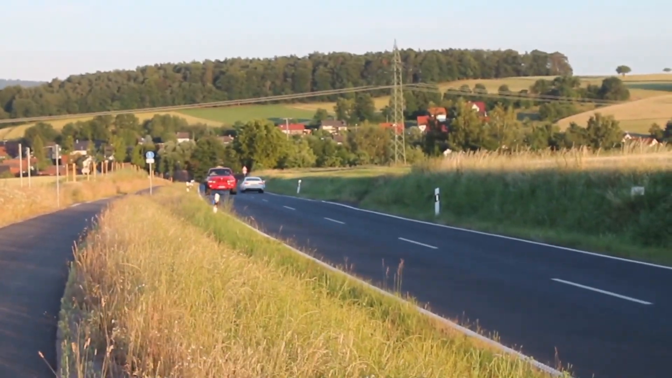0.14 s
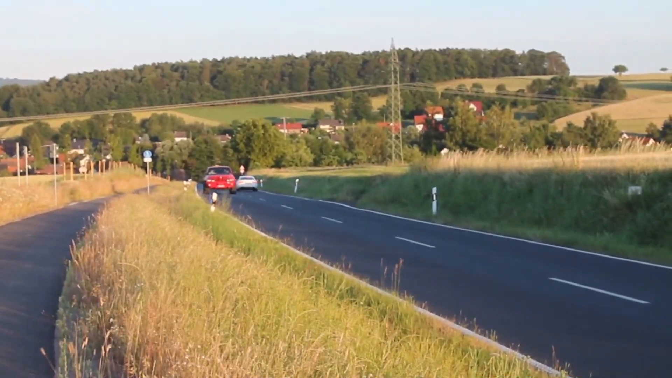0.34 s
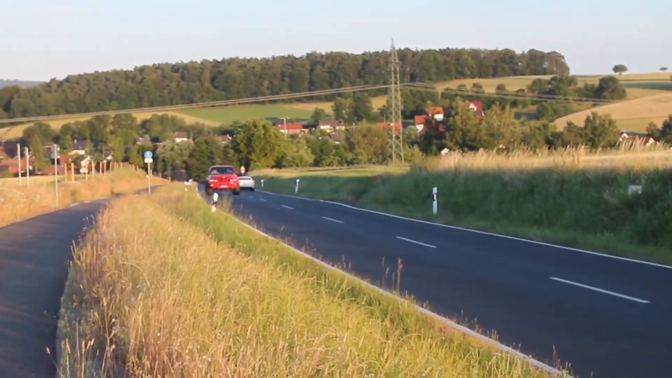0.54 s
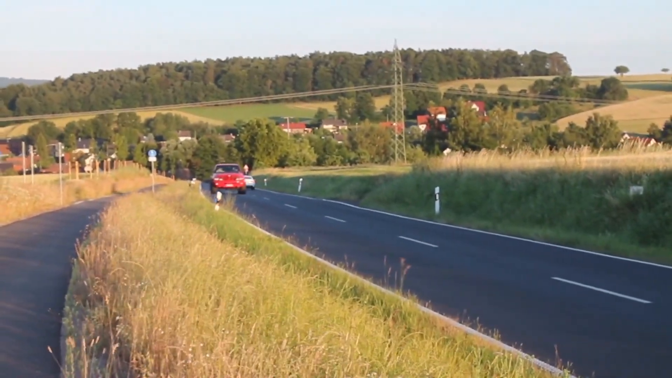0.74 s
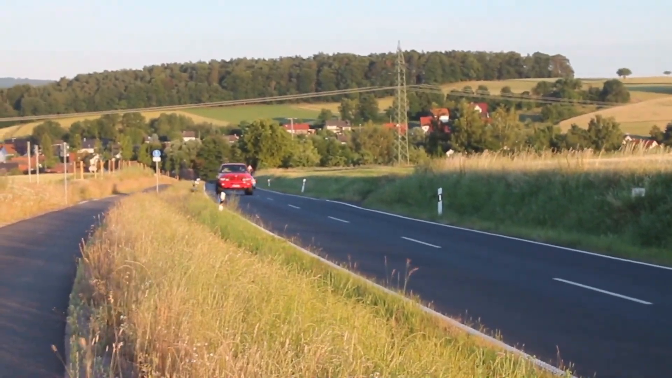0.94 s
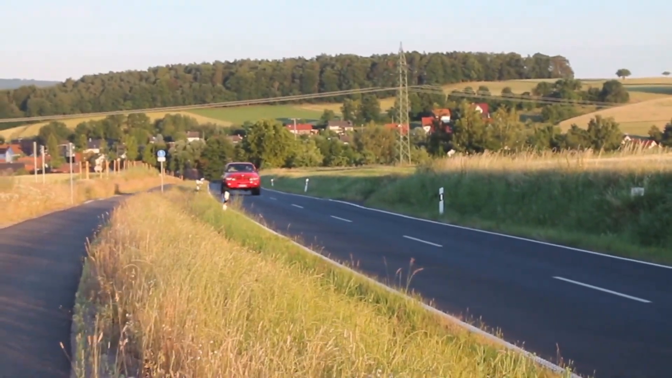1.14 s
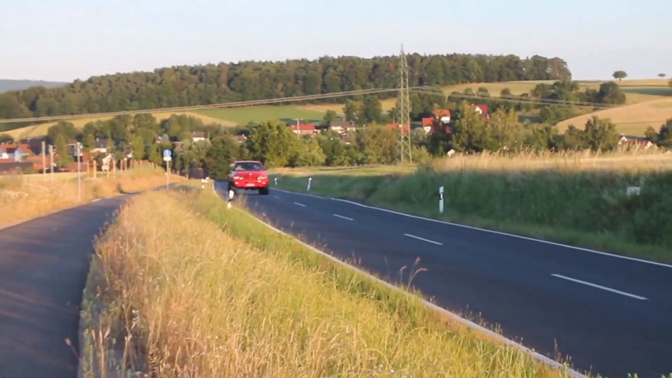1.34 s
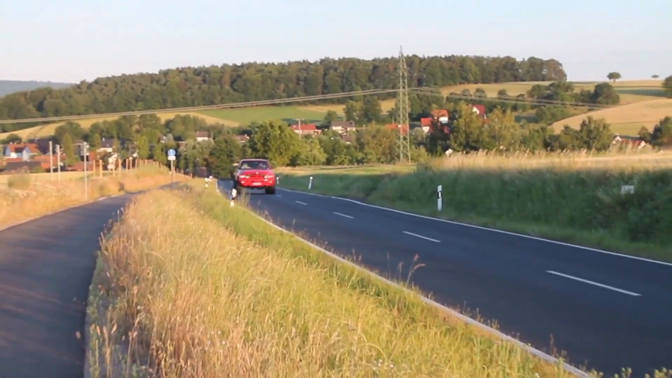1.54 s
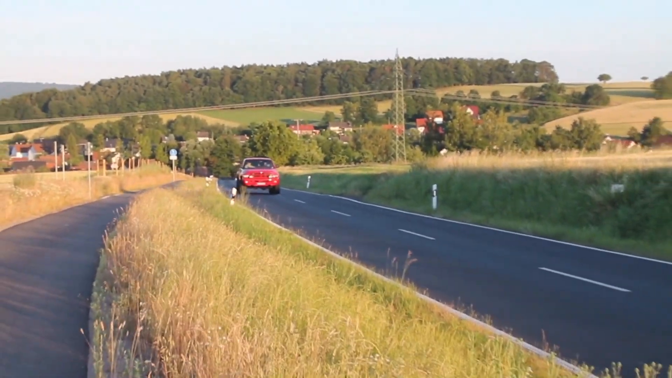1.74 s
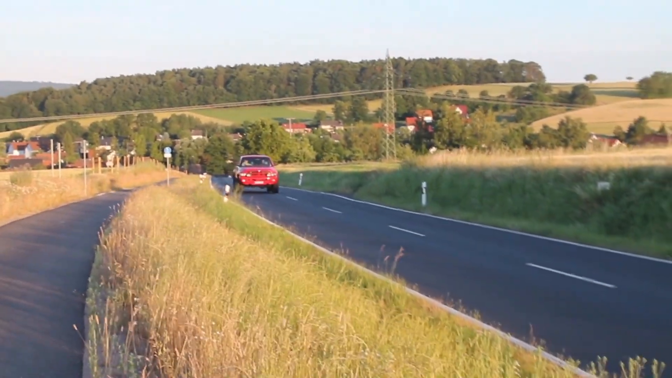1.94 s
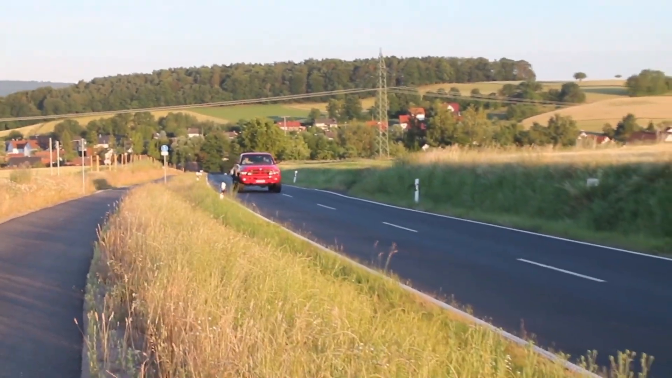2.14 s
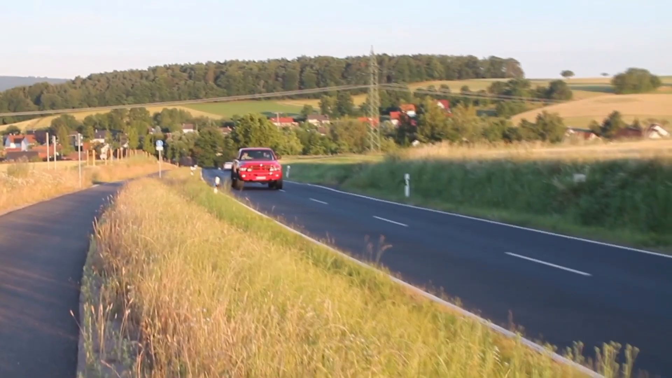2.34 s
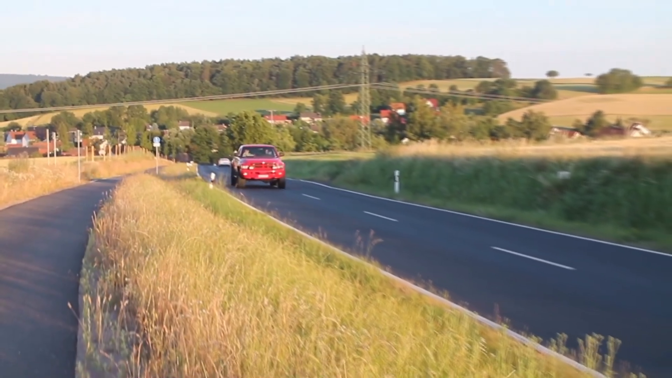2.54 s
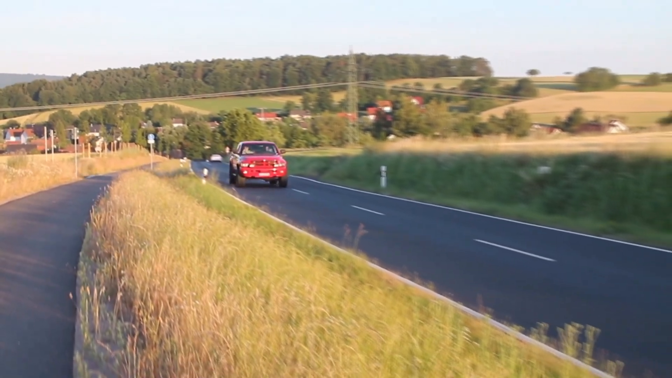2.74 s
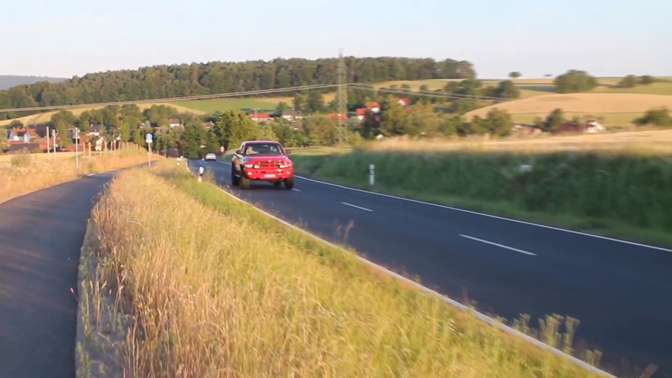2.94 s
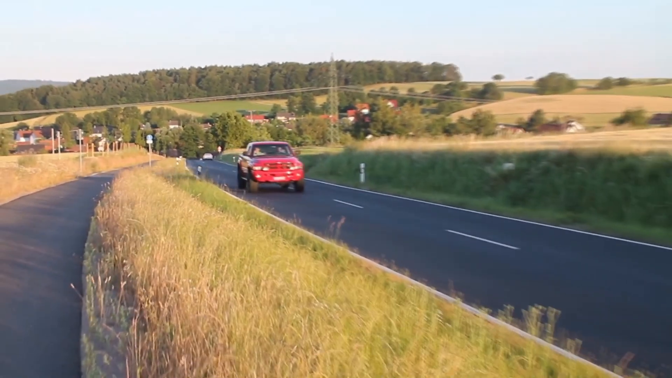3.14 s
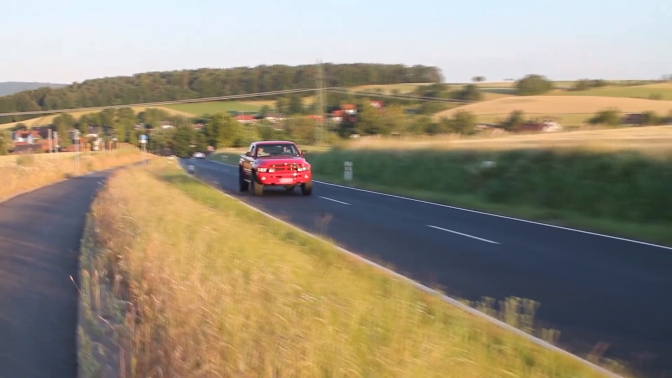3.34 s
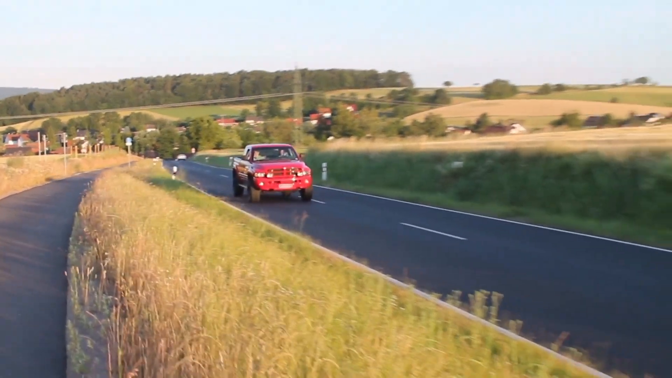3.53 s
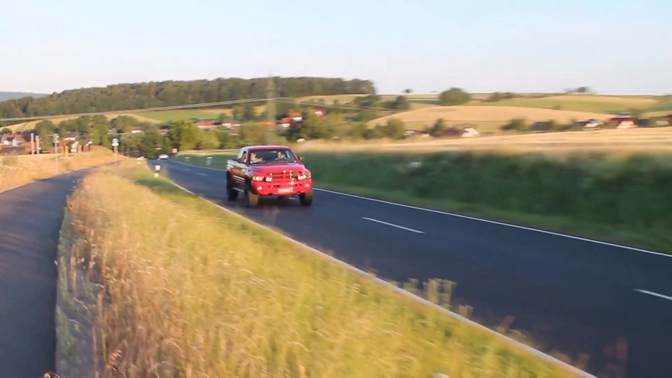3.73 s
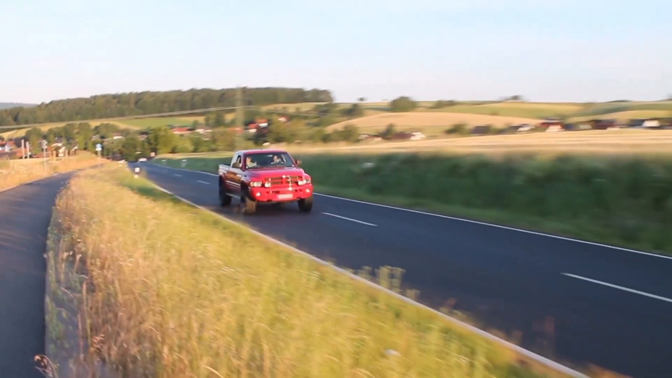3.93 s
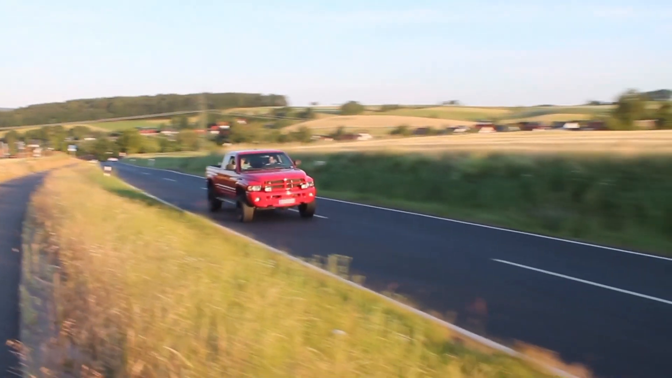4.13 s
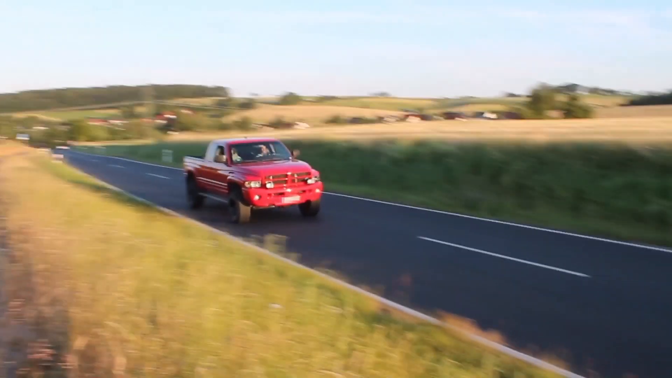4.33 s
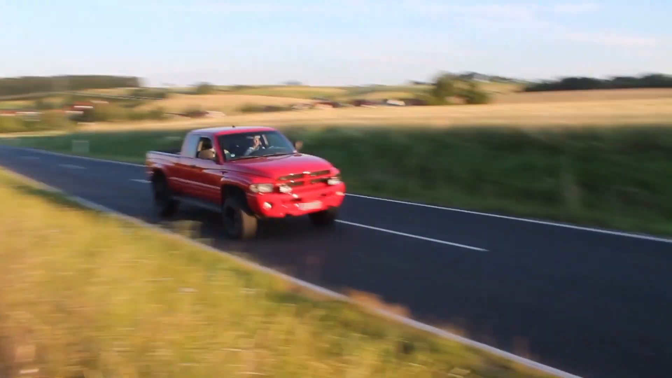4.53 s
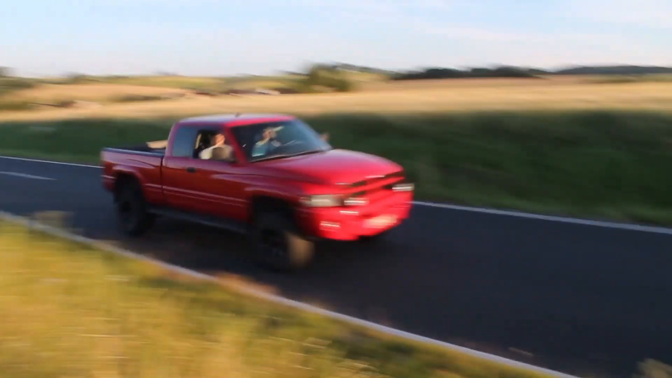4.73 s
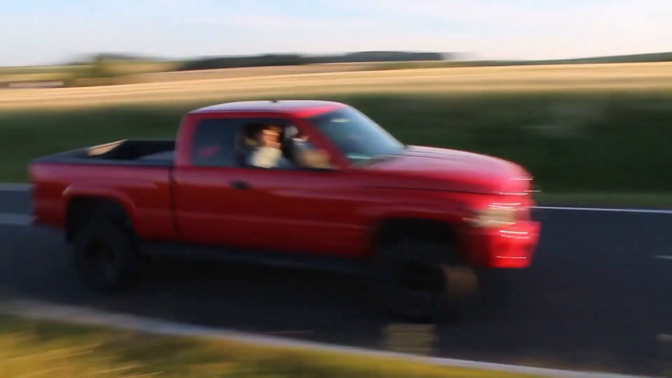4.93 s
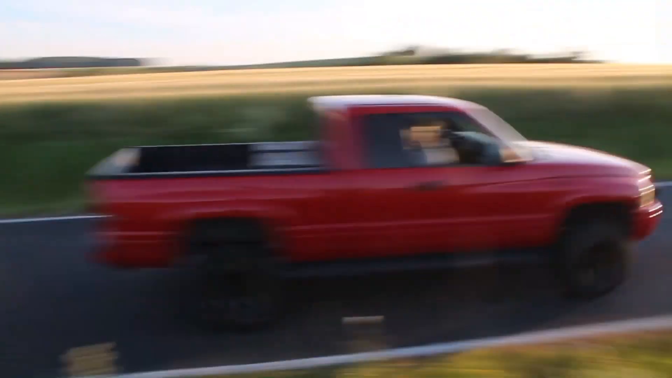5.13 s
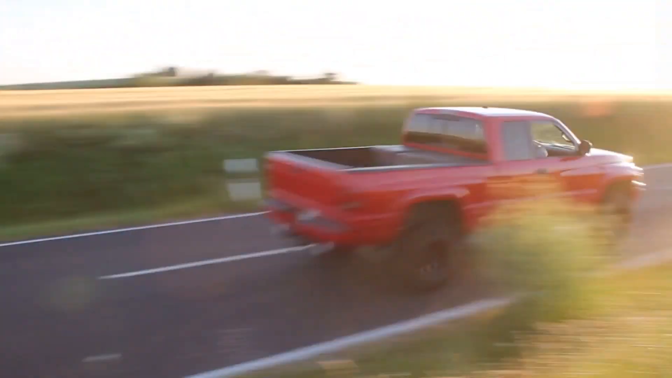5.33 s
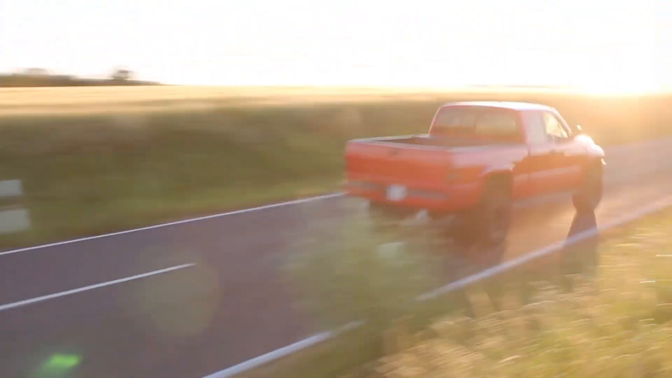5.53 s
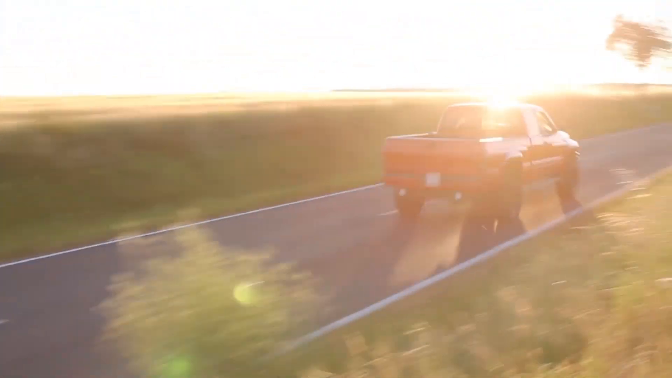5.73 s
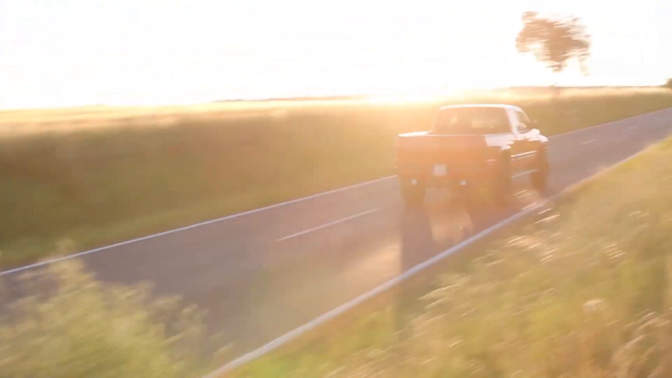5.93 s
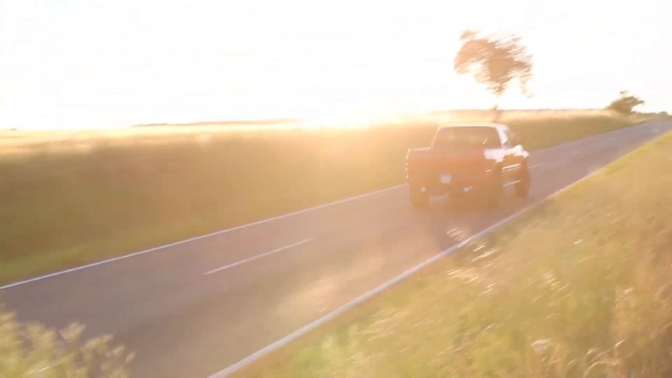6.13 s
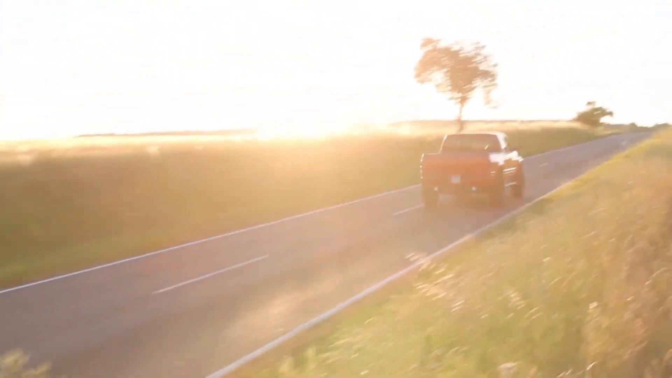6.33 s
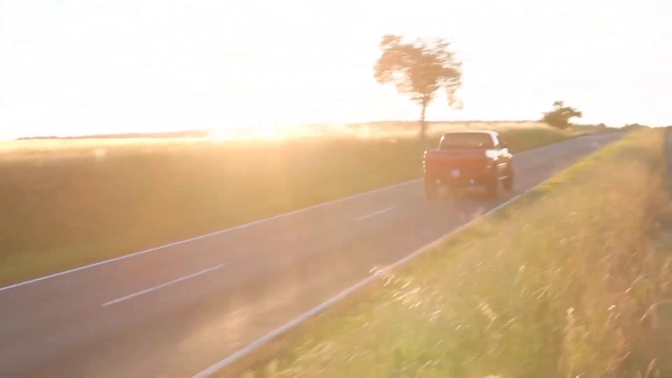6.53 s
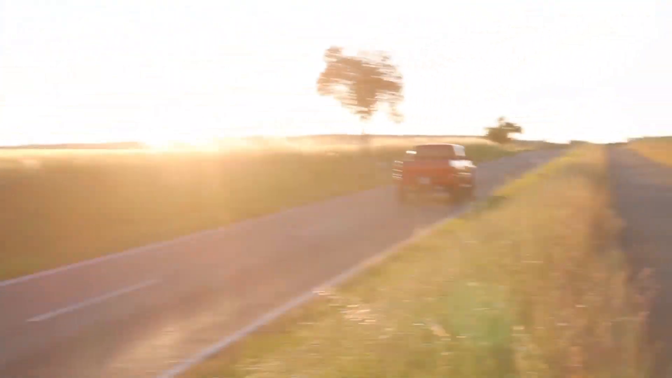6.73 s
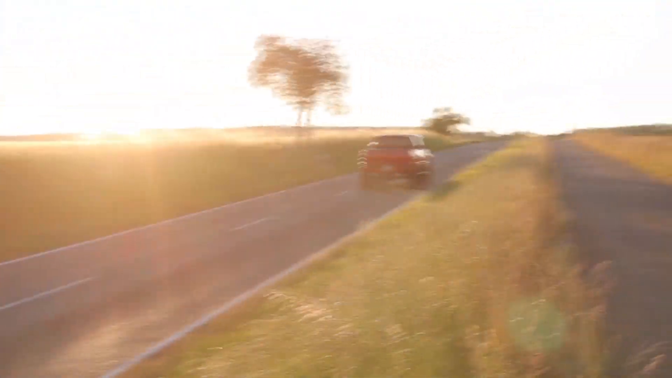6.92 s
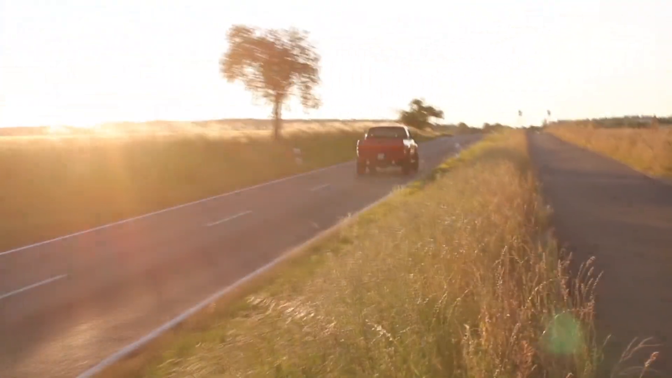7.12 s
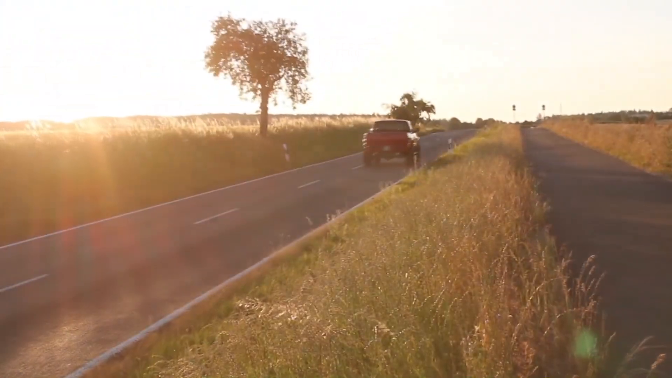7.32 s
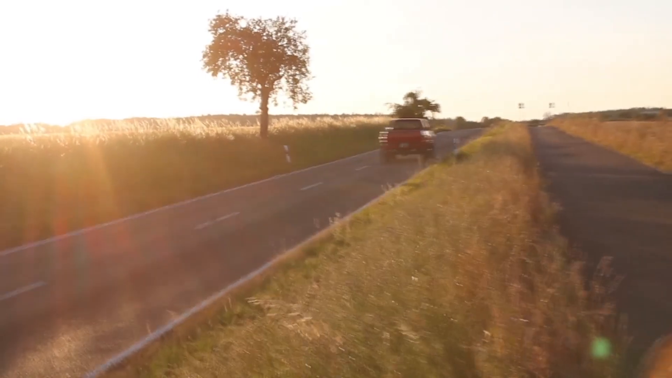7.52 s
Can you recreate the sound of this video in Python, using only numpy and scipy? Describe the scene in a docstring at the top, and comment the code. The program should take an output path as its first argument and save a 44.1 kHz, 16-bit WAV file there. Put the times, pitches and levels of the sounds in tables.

```python
"""A six-cylinder diesel pickup pulls up a country road, passes close to a camera microphone and draws away.
Its exhaust is a sum of lines locked to the firing rate; the knock, roar and hiss are coloured noise
that swells at each firing; the turbo and gears whistle as unsteady sines and the tyres ring as resonances.
Another car recedes at first as fading noise, three bush crickets chirp in the verge in rasps of noise,
and light wind thumps the microphone with short pressure pulses."""
import sys
import numpy as np
from scipy import signal
from scipy.fft import rfft, irfft, next_fast_len
from scipy.io import wavfile
from scipy.ndimage import uniform_filter1d, map_coordinates

SR = 44100
rng = np.random.default_rng(int(sys.argv[2]) if len(sys.argv) > 2 else 0)


def file_out(sig):
    """Save sig as 16-bit WAV at sys.argv[1]."""
    # one column per channel
    cols = np.atleast_2d(sig).T
    # limit, then scale
    lim = np.clip(cols, -1, 1)
    pcm = np.round(lim * 32767).astype(np.int16)
    wavfile.write(sys.argv[1], SR, pcm)


N = 338247
T = np.arange(N) / SR  # time of each sample [s]

# the pass: truck closest [s], its speed [m/s], distance to the lane [m]
PASS_S, SPEED_M_S, LANE_M = 5.06, 16, 6
BOUNCE_M2 = .68  # twice the product of source and microphone heights [m2]
PIPE_PASS_S, PIPE_GAP_M = 5.19, 3  # tailpipe closest [s], its distance then [m]
SOUND_M_S = 343
# where in its cycle the engine starts, and the knock's lead on the exhaust beat [firings]
FIRST_FIRING, KNOCK_LEADS = .62, .39
CREST_DB = 11  # peak of a knock over its rms
TOP_HZ = 15780  # upper band limit

# engine speed as the driver opens up: (time [s], firing rate at the truck [Hz])
FIRING_RATE = [(0, 87.73), (2.3, 88.1), (3.3, 91.32), (4.3, 96.27), (5.1, 99.35), (5.95, 99.45),
               (6.8, 102.64), (7.67, 105.56)]
# level of the truck: (time [s], exhaust [dB], engine knock [dB])
TRUCK_LEVEL = [(0, -35, -49), (.6, -31.5, -50.5), (1.2, -28, -53), (1.8, -25, -45), (2.35, -24, -35),
               (2.8, -19.5, -32), (3.2, -12, -29), (3.5, -12.5, -27), (3.85, -12, -26), (4.3, -13.5, -24),
               (4.8, -15, -23.5), (5.15, -18, -21.5), (5.5, -14.5, -22), (5.75, -12.5, -24),
               (6.2, -16.5, -25), (6.7, -23, -25.5), (7.2, -25.5, -30), (7.67, -25.5, -32.5)]
# exhaust colour by place: (distance past the microphone [m], firing multiples 1 to 6 [dB],
# uneven lines [dB], rumble [dB]), all over the exhaust level
EXHAUST_COLOUR = [(-82, -3.5, 0, -14.5, -27, -48, -42, -20, -8.5),
                  (-58.5, -6.5, 0, -15.5, -21, -52, -32, -15, -10.5),
                  (-36, -5.5, 0, -11.5, -23.5, -27.5, -26, -19.5, -12.5),
                  (-15.5, -7, 0, -8.5, -29, -27, -27, -7, -16.5),
                  (-1, -6.5, 0, -11, -9.5, -15, -15, -8, -15),
                  (2.5, -3, 0.0042, -16, -9.5, -16, -32, -6, -9.5),
                  (10, -6.5, 0, -10, -20, -25, -29, -8, -15), (26, 4.5, 0, -4.5, -11.5, -30, -33, -1, -3),
                  (39, 5.5, 0, -15, -27, -17, -27, -2, -2)]
# unequal cylinders put lines between the firing multiples: (multiple of shaft speed, relative level [dB])
UNEVEN_LINES = [(2, -41), (4, -20), (5, -8.5), (7, -13.5), (8, -13), (10, -16), (11, -20), (13, -22),
                (14, -24), (16, -18), (17, -20), (19, -18), (20, -19.5), (21, -20), (22, -21), (23, -17),
                (24, -24.5), (25, -23.5), (26, -35)]
# spectrum of the exhaust rumble: (frequency [Hz], relative level [dB])
RUMBLE_COLOUR = [(15, -18), (40, -11), (80, -0.5), (140, 2), (260, 2.5), (380, -10.5), (520, -35)]
# noise colour by place: (distance past the microphone [m], tyre roar [dB], hiss [dB]), both over the knock
NOISE_BALANCE = [(-78, 7.5, -17), (-59, 8.5, -12), (-41, 1.5, -17), (-24.5, 5, -20), (-15.5, 3.5, -9),
                 (-11, 2.5, -2), (-2.5, -8, 0), (1.5, -2.5, 1.5), (7, -0.5, -4), (15.5, 5.5, -4.5),
                 (29, 2, -12), (30, 4, -11)]
# the knock blurs with distance: (time [s], sharpness [0-1])
SHARPNESS = [(0, .1), (2.8, .15), (3.9, .4), (4.6, .68), (5.1, .85), (5.4, .85), (5.8, .45), (6.5, .2),
             (7.67, .12)]
# roar heard from ahead and from behind: (frequency [Hz], relative level [dB per Hz])
ROAR_AHEAD = [(220, -2), (380, -3.5), (444, -19.5), (582, -4.5), (668, -1), (786, 0), (848, 1.5),
              (925, -9.5), (1160, -0.5), (1560, -6.5), (1700, -4), (2210, -18), (3740, -120)]
ROAR_BEHIND = [(220, -25), (380, -1.5), (395, 5.5), (454, -19), (525, -8), (576, 1), (622, 1.5), (888, 2),
               (1020, 3.5), (1360, -2.5), (1610, 1.5), (1990, -2.5), (2400, -5), (3120, -11.5),
               (5280, -120)]
# knock of the engine, then hiss from ahead and from behind: (frequency [Hz], relative level [dB])
KNOCK_COLOUR = [(710, -7), (1200, -2), (1550, -6), (1910, 2), (2220, 0.5), (3610, -4), (4470, -10),
                (5400, -14), (7020, -25.5), (11900, -120)]
HISS_AHEAD = [(2650, -0.5), (4500, 2), (5500, -1), (6310, 1.5), (7170, -0.5), (8620, -3.5), (9800, -17),
              (12500, -26.5), (16200, -62), (22000, -120)]
HISS_BEHIND = [(2650, -1), (4500, 3.5), (5900, -4.5), (6800, 0.5), (8000, -3.5), (9300, -13),
               (10300, -20.5), (11000, -25), (12500, -33), (16000, -55)]
# a dark band in the treble that moves as the camera turns: (time [s], centre [Hz], depth [dB])
DARK_BAND = [(1.8, 5500, 0), (2.3, 5750, -5), (3.2, 6340, -3), (3.5, 7000, -6), (5.3, 9500, 0),
             (5.55, 8600, -11), (6, 7850, -11), (6.5, 7420, -7), (6.9, 7200, -1)]
# receding car: (time [s], level [dB]), and its tyre noise: (frequency [Hz], relative level [dB])
CAR_LEVEL = [(0, -34), (.3, -35.5), (.6, -38), (.9, -50), (1.3, -60), (1.8, -86)]
CAR_COLOUR = [(260, -69), (450, -39), (737, -3), (1090, -2.5), (1500, -13), (1700, -17), (2000, -32),
              (3100, -25), (5130, -54), (7000, -54), (9100, -82), (15400, -120)]
# cricket songs, named by wing pitch:
# (first chirp [s], chirp period [s], wing pitch [Hz], width [Hz], steepness of its flanks)
HIGH_SONG = (0.074, .1113, 10600, 2700, 2.2)
MIDDLE_SONG = (0.038, 0.11, 10160, 1400, 4)
LOW_SONG = (0.0964, .1124, 9400, 1450, 2.5)
# cricket levels: (time [s], level [dB])
HIGH_LEVEL = [(0, -53.5), (.5, -53), (1, -56.5), (1.5, -56), (1.9, -65)]
MIDDLE_LEVEL = [(0, -69), (.5, -69), (.9, -56), (1.4, -58), (1.65, -68)]
LOW_LEVEL = [(0, -66), (.9, -59), (1.5, -56), (2.5, -53), (3.7, -54.5), (5, -74), (6.5, -52), (7.67, -55.5)]
# wing strokes of a chirp: (time in the chirp before a 9 ms lag [s], relative level [dB])
WING_STROKES = [(-.004, -13), (0.032, -14), (.071, -30)]
# steady background noise: (frequency [Hz], relative level [dB])
FLOOR_COLOUR = [(20, -16), (300, -18), (2000, -20), (6000, -22), (12000, -19), (16000, -19)]
# wind thumps: (time [s], peak level [dB], pitch [Hz], length [s])
WIND_THUMPS = [(.44, -32, 80, 0.043), (1.557, -27, 130, 0.03), (1.588, -33, 180, 0.017),
               (2.234, -12.5, 147, 0.016), (2.252, -18, 335, 0.0088), (2.274, -12, 189, 0.0079),
               (2.305, -19, 121, .025), (2.565, -22, 171, 0.016), (3.27, -9, 244, 0.008),
               (3.273, -10, 483, 0.0058), (3.291, -12, 387, 0.0061), (3.34, -18, 119, 0.024),
               (3.39, -11, 180, 0.013), (3.449, -18, 200.5, .025), (3.693, -22, 130, .025)]
# gear whine: (time [s], pitch [Hz], level [dB])
GEAR_WHINE = [(1.3, 3330, -85), (1.55, 3320, -62), (1.9, 3350, -52), (2.17, 3330, -49), (2.3, 3340, -54),
              (3, 3300, -48), (4, 3390, -44), (4.4, 3365, -49)]
# engine block heard from ahead: (frequency [Hz], width [Hz], relative level [dB]), then (time [s], level [dB])
BLOCK_MODES = [(810, 167, 5.5), (1920, 350, 0.5), (3424, 360, -0.5), (6840, 710, -11.5)]
BLOCK_LEVEL = [(1.5, -66), (2.5, -63), (3.2, -41), (4, -30), (4.5, -20), (4.9, -31), (5.15, -38),
               (5.399, -68)]
# growl of the tailpipe as its side comes into view:
# (frequency [Hz], width [Hz], relative level [dB]), then (time [s], level [dB])
GROWL_MODES = [(553, 150, -0.14), (690, 160, 0.47), (806, 26, -1.8)]
GROWL_LEVEL = [(3.2, -81), (4, -42), (4.5, -31), (4.64, -21.5), (4.95, -22), (5.08, -30.5), (5.3, -36.5),
               (5.6, -27), (6.2, -40), (6.7, -40), (7, -66)]
# lines in the growl: (multiple of shaft speed, relative level [dB])
PURR_LINES = [(16, 0), (17, -9), (19, -10), (20, -3), (22, -2), (23, -9), (25, -9)]
# turbo whistle: (time [s], pitch at the truck [Hz], level [dB])
TURBO_WHISTLE = [(3.3, 10200, -110), (3.36, 10300, -64), (3.6, 10880, -68), (3.95, 11420, -65),
                 (4.35, 11790, -61), (4.75, 11800, -58), (4.97, 11740, -63), (5.1, 11700, -95),
                 (5.42, 11560, -95), (5.52, 11550, -62), (5.85, 11600, -67), (6.05, 11640, -110)]
# top edge of the knock: (time [s], level [dB]), then (frequency [Hz], relative level [dB])
EDGE_LEVEL = [(3.5, -69), (3.9, -60), (4.45, -48), (4.75, -53), (5.15, -45), (5.45, -56), (5.7, -54),
              (6.15, -65), (6.6, -57), (7.1, -82)]
EDGE_COLOUR = [(9000, -20), (11000, -2), (13000, -6), (16000, -12)]
# tyre cavities heard from behind: (frequency [Hz], width [Hz], relative level [dB]), then (time [s], level [dB])
TYRE_MODES = [(1067, 340, -0.27), (1560, 300, -0.73)]
TYRE_LEVEL = [(5.4, -61), (5.9, -33), (6.4, -23.5), (6.8, -23.5), (7.2, -23), (7.67, -25.5)]
# hard knocks: (time [s], nominal peak [dB], top edge over it before a 16 dB lift [dB])
HARD_KNOCKS = [(4.3849, -4, -36), (4.5434, -8, -27), (4.672, -8, -36), (4.6984, -10, -34),
               (4.7094, -5, -31), (4.8344, 0, -35), (4.9541, 2, -35), (5.1003, -14, -32),
               (5.1322, -10, -34), (5.1403, -9, -32), (5.198, 2, -33), (5.211, -7, -31), (5.241, -1, -37),
               (5.3218, -2, -32), (5.3847, -6, -36), (5.458, 1, -37), (5.6894, -3, -30), (6.1084, -9, -37),
               (6.1984, -13, -36), (6.5944, -13, -30)]
# the sound fades out and back: (time of silence [s], length [s])
DROP_OUTS = [(3.3082, 0.011), (5.01, 0.0097), (5.378, 0.01), (6.9456, 0.0094)]


def amp(db):
    """Amplitude of a level in dB."""
    return 10 ** (np.asarray(db) / 20)


def unit(x):
    """x scaled to rms 1."""
    return x / np.sqrt(np.mean(x ** 2) + 1e-20)


def curves(rows):
    """One value per sample for each column after the time."""
    s, *cols = np.transpose(rows)
    return [np.interp(T, s, c) for c in cols]


def by_place(rows):
    """One value per sample for each column after the metres past the microphone."""
    m, *cols = np.transpose(rows)
    return [np.interp(SPEED_M_S * (T - PASS_S), m, c) for c in cols]


def wobble(rate):
    """A smooth random curve, rate knots a second."""
    return map_coordinates(rng.standard_normal(int(N * rate / SR) + 4), [T * rate])


def filtered(x, response):
    """x times a response of frequency."""
    m = next_fast_len(N + 8192)
    return irfft(rfft(x, m) * response(np.fft.rfftfreq(m, 1 / SR)), m)[:N]


def shape(points):
    """Gain of (frequency [Hz], level [dB]) points on a log axis, -120 dB outside them."""
    f, db = np.transpose(points)
    return lambda hz: amp(np.interp(np.log(hz + 1), np.log(f + 1), db, -120, -120))


def rush(points, patchy_db, gate=1, size=10):
    """Coloured noise of rms 1 from gated noise with patches of random gain, size frames long."""
    z = signal.stft(gate * rng.standard_normal(N), nperseg=512)[2]
    across_pitch = uniform_filter1d(rng.standard_normal(z.shape), 6, 0)
    patches = unit(uniform_filter1d(across_pitch, size, 1))
    noise = signal.istft(z * amp(patchy_db * patches), nperseg=512)[1][:N]
    return unit(filtered(noise, shape(points)))


def ringing(modes, gate):
    """Gated noise of rms 1 through resonances with steep flanks."""
    def response(f):
        return sum(amp(db) * (1j * f * w / (c * c - f * f + 1j * f * w)) ** 2 for c, w, db in modes)
    return unit(filtered(gate * rng.standard_normal(N), response))


def tone(rows, drift_hz, flutter_db, shift=1):
    """A sine whose pitch drifts and whose level flutters about (time [s], pitch [Hz], level [dB]) rows."""
    hz, db = curves(rows)
    phase = 2 * np.pi * np.cumsum(shift * hz + drift_hz * wobble(60)) / SR
    return np.sqrt(2) * amp(db + flutter_db * wobble(24.55)) * np.sin(phase)


def doppler():
    """Pitch factor of the passing tailpipe, from its speed along the line to the microphone."""
    along = SPEED_M_S * (T - PIPE_PASS_S)
    receding = SPEED_M_S * along / np.hypot(PIPE_GAP_M, along)
    return 1 / (1 + receding / SOUND_M_S)


def shaft_lines(lines, turn, level_db, level_rate, phase_rad, phase_rate):
    """Unsteady cosines on multiples of shaft speed, a third of the firing rate; phase_rad(k) is the drift."""
    return sum(amp(db + level_db * wobble(level_rate))
               * np.cos(k * turn / 3 + .7 * k * k + phase_rad(k) * wobble(phase_rate))
               for k, db in lines)


def firing_gate(firings):
    """Maker of noise gates: each firing knocks at its own strength, each cylinder has its habit."""
    count = firings.astype(int)[-1] + 2
    cylinder_db = np.resize([1.5, 0.5, 3.8, 0.0, 3.7, 2.5], count)
    strength_db = 1.5 * rng.standard_normal(count) + cylinder_db
    knocks = firings + KNOCK_LEADS
    after = np.mod(knocks, 1)
    burst = unit(amp(strength_db[knocks.astype(int)]) * after * np.exp(-after / 0.24))
    sharp = curves(SHARPNESS)[0]
    return lambda depth: unit(1 + np.clip(depth * sharp, 0, 1) * (burst - 1))


def exhaust(turn):
    """Firing multiples in step make one pressure peak a firing; uneven lines and rumble lie beneath."""
    *multiples_db, uneven_db, rumble_db = curves(TRUCK_LEVEL)[0] + by_place(EXHAUST_COLOUR)
    beat = 0
    for k, db in enumerate(multiples_db, 1):
        level = amp(db + 0.28 * wobble(12) + 0.85 * (k - 1.5) * wobble(5))
        beat = beat + np.sqrt(2) * level * np.cos(k * turn + 0.11 * (k - 1) * wobble(3.16))
    uneven = unit(shaft_lines(UNEVEN_LINES, turn, 1.3, 5, lambda k: 0.079 * k, 5))
    return beat + amp(uneven_db) * uneven + amp(rumble_db) * rush(RUMBLE_COLOUR, 2.2)


def off_road(x):
    """Adds the path off the asphalt: it lags most when the truck is near and clears the grass just after."""
    distance = np.hypot(LANE_M, SPEED_M_S * (T - PASS_S))
    share = .5 * np.exp(-((T - PASS_S - .12) / .24) ** 2)
    late = map_coordinates(x, [(T - BOUNCE_M2 / distance / SOUND_M_S) * SR])
    return (x + share * late) / np.sqrt(1 + share ** 2)


def shaded(x):
    """Cuts the moving dark band out of x."""
    hz, t, z = signal.stft(x, SR, nperseg=256)
    s, centre_hz, depth_db = np.transpose(DARK_BAND)
    band = np.exp(-((hz[:, None] - np.interp(t, s, centre_hz)) / 520) ** 2)
    return signal.istft(z * amp(band * np.interp(t, s, depth_db)), SR, nperseg=256)[1][:N]


def knock_roar_and_hiss(gate):
    """Noises that burst once a firing; roar and hiss cross from their front to their rear colour."""
    knock_db = curves(TRUCK_LEVEL)[1]
    roar_db, hiss_db = knock_db + by_place(NOISE_BALANCE)
    angle = np.pi / 4 * (1 + np.tanh((T - PASS_S) / 0.082))
    ahead, behind = np.cos(angle), np.sin(angle)
    roar = ahead * rush(ROAR_AHEAD, 0.82, gate(0.48)) + behind * rush(ROAR_BEHIND, 1.66, gate(0.11))
    # short random patches make the knock noise blotchy
    knock = rush(KNOCK_COLOUR, 1.9, gate(1), size=2)
    hiss = ahead * rush(HISS_AHEAD, 2.5, gate(1), size=4) + behind * rush(HISS_BEHIND, 2.664, gate(1))
    flicker_db = 1.6 * wobble(30)  # the treble flickers
    noise = amp(roar_db) * roar + amp(knock_db + 0.13 * flicker_db) * knock
    noise = noise + amp(hiss_db + flicker_db) * hiss
    return shaded(off_road(noise))


def receding_car():
    """Tyre noise of another car, fading out in the first two seconds."""
    return amp(curves(CAR_LEVEL)[0]) * rush(CAR_COLOUR, 1.1)


def cricket(song, level):
    """Three raspy wing strokes a chirp: band noise under a swell for each stroke."""
    start, period, hz, width, steep = song
    since = np.mod(T - start + period / 4 + 0.0018 * wobble(5.4), period) - period / 4
    swell = sum(amp(db) * np.exp(-((since - s - .009) / 0.0096) ** 2) for s, db in WING_STROKES)
    rasp = filtered(rng.standard_normal(N), lambda f: 1 / (1 + np.abs((f - hz) / (width / 2)) ** steep))
    return amp(curves(level)[0] + 1.3 * wobble(25)) * unit((swell + 0.065) * rasp)


def field():
    """Steady, faint background noise of the place."""
    return amp(-61.5) * rush(FLOOR_COLOUR, 1.1)


def wind():
    """Each puff pushes the microphone diaphragm for a few cycles at most."""
    s, db, hz, length = np.transpose(WIND_THUMPS)[..., None]
    offsets = np.arange(-SR // 16, SR // 16)
    t = offsets / SR
    puffs = -amp(db) * np.exp(-(2 * t / length) ** 2) * np.cos(2 * np.pi * hz * t + 0.44)
    at = (s * SR).astype(int) + offsets
    return np.bincount(at.ravel(), puffs.ravel(), N)[:N]


def gear_whine():
    """An unsteady sine from the gears."""
    return tone(GEAR_WHINE, 18, 3)


def engine_block(gate):
    """Resonances of the block, driven by noise that bursts at each firing, heard from ahead."""
    return amp(curves(BLOCK_LEVEL)[0]) * ringing(BLOCK_MODES, gate(1))


def tailpipe_growl(turn, gate):
    """Pipe resonances driven by gated noise, with a purr of shaft lines."""
    purr = shaft_lines(PURR_LINES, turn, 1.5, 8, lambda k: .5, 8)
    level = amp(curves(GROWL_LEVEL)[0] + 2.1 * wobble(20))
    return level * (ringing(GROWL_MODES, gate(0.39)) + amp(-2.5) * purr)


def turbo():
    """An unsteady whistle, its pitch shifted by the pass."""
    return tone(TURBO_WHISTLE, 30, 3, doppler())


def knock_edge(gate):
    """The highest treble of the knock, in bursts at each firing."""
    return amp(curves(EDGE_LEVEL)[0] + 2.5 * wobble(30)) * rush(EDGE_COLOUR, 2, gate(.9))


def tyre_cavities():
    """Steady noise through the tyre cavity resonances, heard from behind."""
    return amp(curves(TYRE_LEVEL)[0] + 0.62 * wobble(7)) * ringing(TYRE_MODES, 1)


def hard_knocks():
    """Single hard knocks: a burst of metal noise a few ms long."""
    s, db, top_db = np.transpose(HARD_KNOCKS)[..., None]
    offsets = np.arange(SR // 40)
    t = offsets / SR
    at = ((s * SR).astype(int) + offsets).ravel()
    decay = (1 - np.exp(-t / 0.00037)) * amp(-60 * t / 0.013)  # falls 60 dB in 13 ms
    body, top = (np.bincount(at, (amp(level) * decay).ravel(), N) for level in (db, db + top_db))
    noise = body * rush(KNOCK_COLOUR, 0.91) + amp(16) * top * rush(EDGE_COLOUR, 1)
    return amp(-CREST_DB) * noise


def scene():
    """The engine's sources share one firing clock; the verge, car, wind and field join them."""
    firings = FIRST_FIRING + np.cumsum(curves(FIRING_RATE)[0] * doppler()) / SR
    turn = 2 * np.pi * firings
    gate = firing_gate(firings)
    truck = exhaust(turn) + knock_roar_and_hiss(gate) + gear_whine() + engine_block(gate)
    truck = truck + tailpipe_growl(turn, gate) + turbo() + knock_edge(gate) + tyre_cavities() + hard_knocks()
    verge = cricket(HIGH_SONG, HIGH_LEVEL) + cricket(MIDDLE_SONG, MIDDLE_LEVEL) + cricket(LOW_SONG, LOW_LEVEL)
    return (truck + receding_car() + verge + field() + wind())[None]


def record(dry):
    """Brief drop-outs, soft clipping towards a ceiling of 1.4 and the band limit."""
    for s, length in DROP_OUTS:
        dry = dry * np.sin(np.pi * np.clip((T - s) / length, -.5, .5)) ** 2
    clipped = dry / (1 + np.abs(dry / 1.4) ** 8) ** (1 / 8)
    return filtered(clipped[0], lambda hz: hz < TOP_HZ)[None]


dry = scene()
out = record(dry)
file_out(out)
```